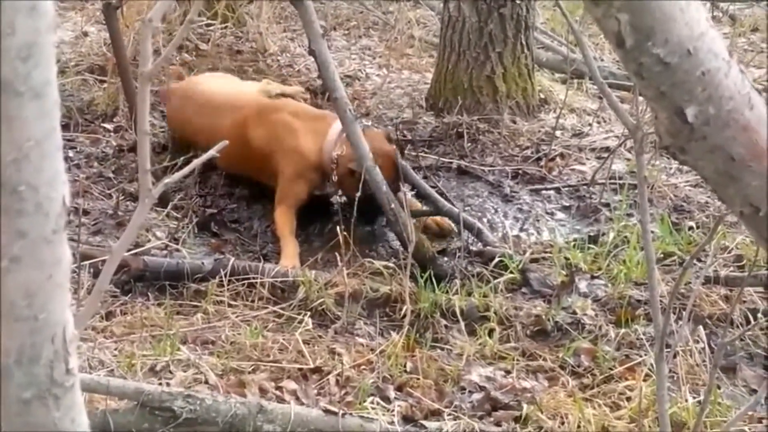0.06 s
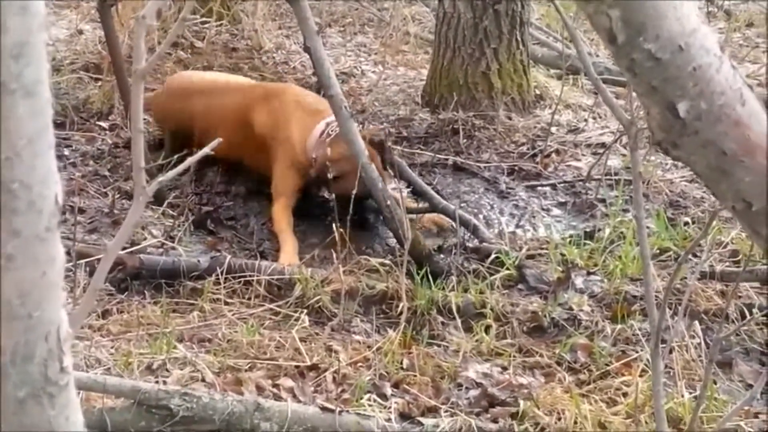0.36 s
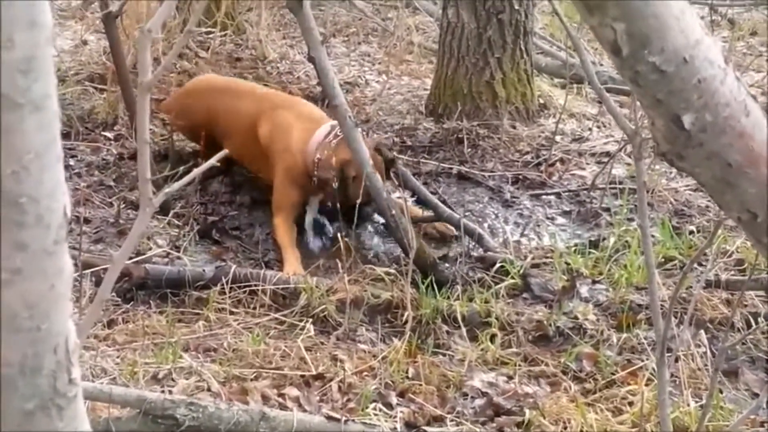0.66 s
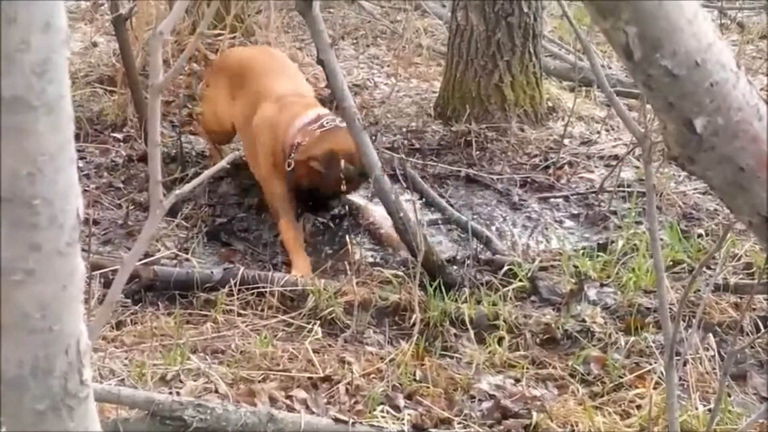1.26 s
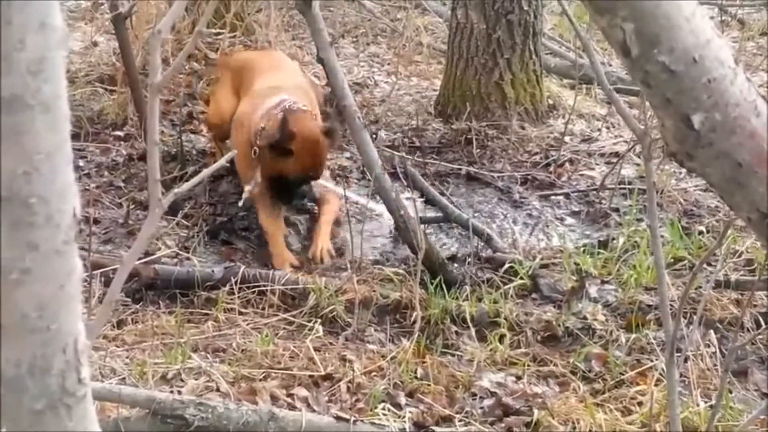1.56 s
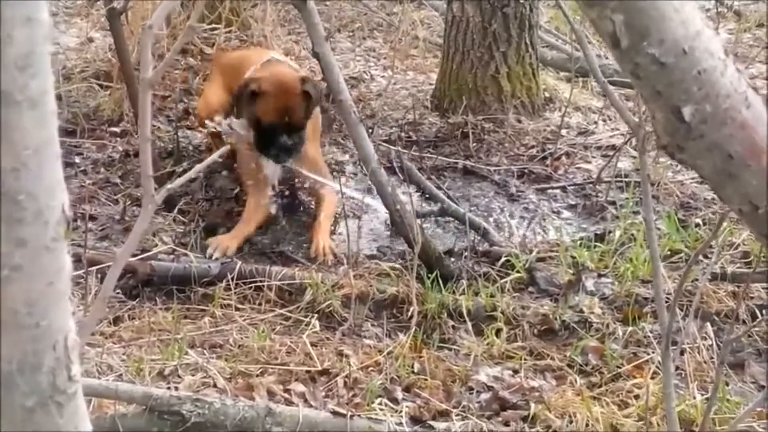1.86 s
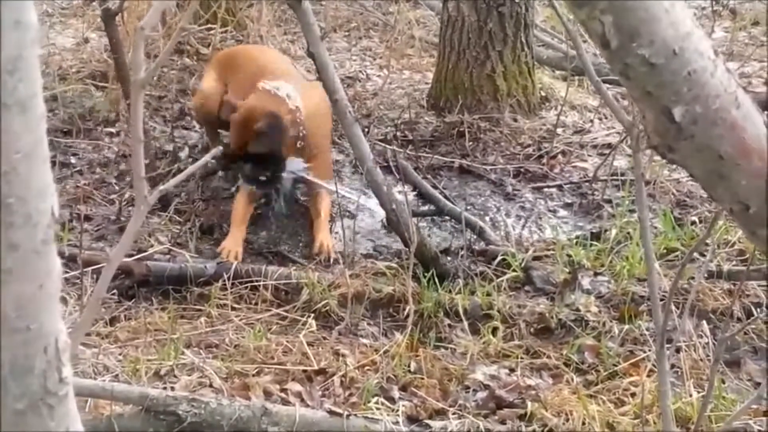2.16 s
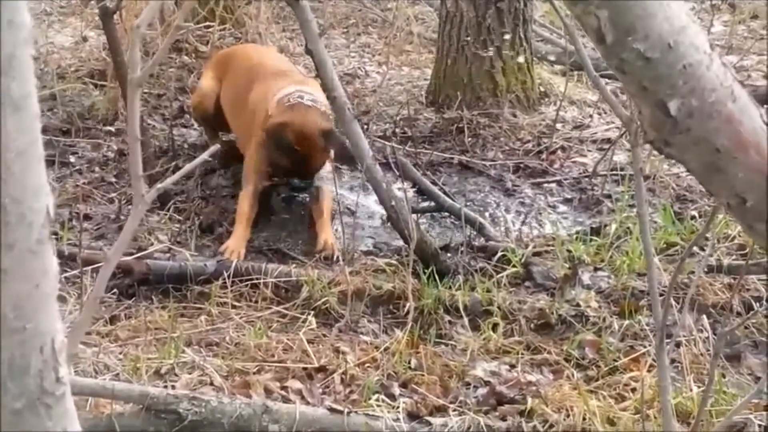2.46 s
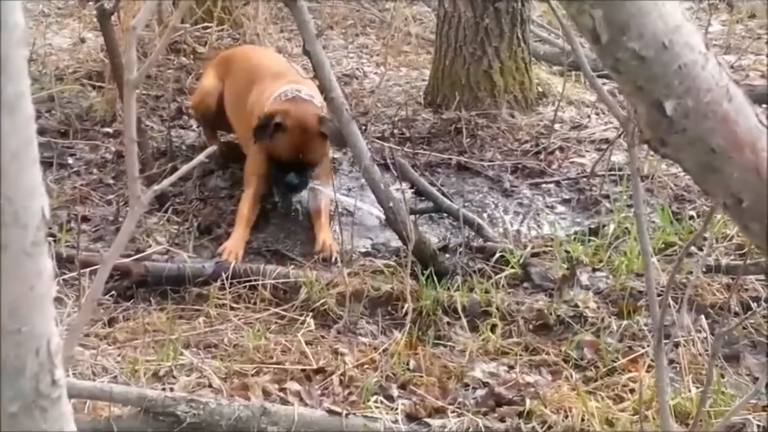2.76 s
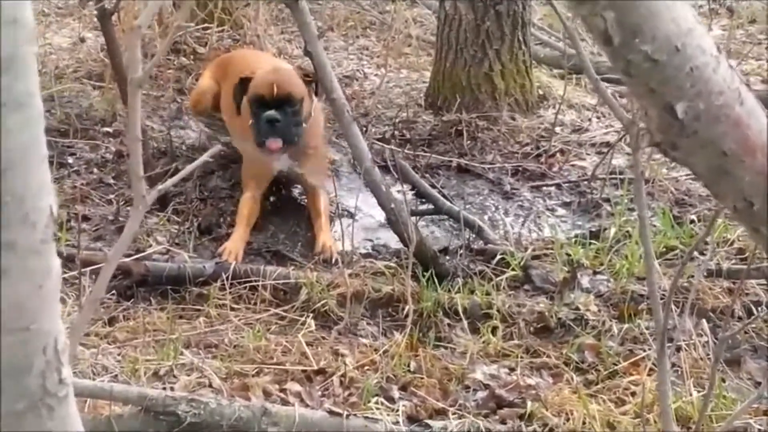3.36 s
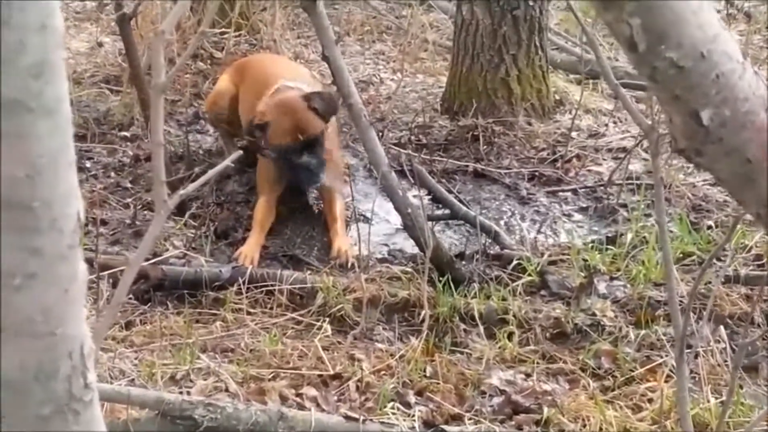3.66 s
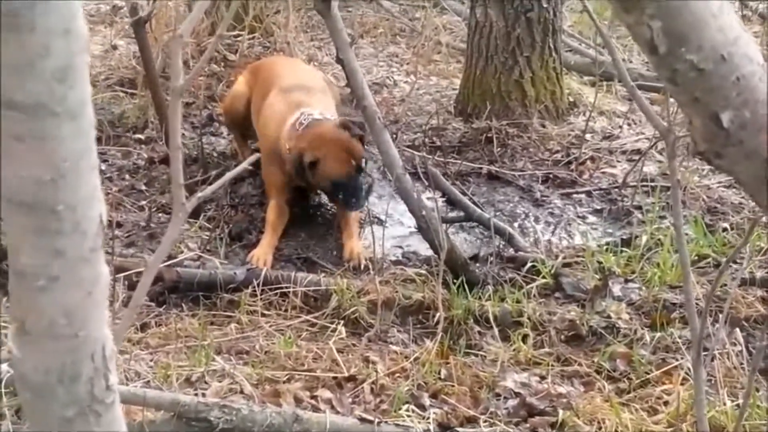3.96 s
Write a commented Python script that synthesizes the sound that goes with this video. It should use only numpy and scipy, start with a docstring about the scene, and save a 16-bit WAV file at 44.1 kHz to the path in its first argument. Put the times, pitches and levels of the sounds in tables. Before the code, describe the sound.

Hissing sprinkler spray splutters in a dog's mouth, with sloshes, plops and wet smacks.

```python
"""A dog bites at a sprinkler jet over wet woodland ground. Light wind and a soft rush run throughout.
The jet, almost blocked at first, hisses from 0.14 s, spatters on the muzzle and patters on leaves.
From 0.35 s it drums in the open mouth and rings over the lips; jaws and paws slosh and plop.
It spits off the teeth from 0.7 s, hardest at 1.65 s; wet smacks join at 1.1 s.
Near 3 s the jet is almost blocked again, then the hiss and the biting go on to 4 s."""
import sys
import numpy as np
from scipy import signal
from scipy.fft import rfft, irfft, next_fast_len
from scipy.io import wavfile
from scipy.ndimage import uniform_filter1d, map_coordinates

SR = 44100
rng = np.random.default_rng(int(sys.argv[2]) if len(sys.argv) > 2 else 0)


def generate_wav(signal):
    """Clip the signal to [-1, 1] and save it as 16-bit WAV at the path in sys.argv[1]."""
    frames = np.transpose(np.atleast_2d(signal))
    scaled = np.clip(frames, -1, 1) * 32767
    pcm = np.round(scaled).astype(np.int16)
    wavfile.write(sys.argv[1], SR, pcm)


N = 4 * SR

# Source spectra. Each row: frequency in Hz, relative density in dB.
AIR_SPECTRUM = [(50, 1), (95, 3), (140, -2), (250, 0), (500, 1), (900, -3), (1400, -9), (2200, -19.5),
                (4000, -27), (8000, -33), (15000, -42)]
WIND_SPECTRUM = [(10, -10), (25, 0), (40, -4.5), (60, -7), (85, -11.5), (130, -20), (300, -57), (900, -100)]
HISS_SPECTRUM = [(1000, -52), (2500, -40), (4500, -23.5), (7000, -8.5), (8200, -3.5), (9500, -0.5),
                 (12000, 0.5), (14000, -.5), (15800, -5.5)]
SPATTER_SPECTRUM = [(800, -28), (1700, -5), (2600, -7), (3400, -3.5), (4400, 1.5), (5300, -0.5), (6300, 2),
                    (8000, -4.5), (10000, -10), (15000, -6.5)]
PATTER_SPECTRUM = [(500, -12), (1200, -4.5), (2000, -0.5), (2600, 0), (3500, -0.5), (5500, -5.5),
                   (12000, -9)]
LOW_CAVITY_SPECTRUM = [(60, -45), (160, -9), (300, -11), (490, 4), (720, 0.5), (950, 1.5), (1250, -6.5),
                       (2200, -33.5)]
HIGH_CAVITY_SPECTRUM = [(600, -36), (1100, -5.5), (1550, 5), (1800, 0.5), (2200, -10.5), (3200, -13.5),
                        (6000, -43)]
SPIT_SPECTRUM = [(300, -13), (2500, -15), (5500, -9.5), (8000, -5), (12500, -1), (15800, 0)]
SMACK_SPECTRUM = [(300, -8), (1500, -8), (2600, -3), (4300, 2), (6500, -8), (10000, -9), (15800, -2)]
# Wind, jet hiss and spatter envelopes. Each row: time in seconds, relative level in dB.
WIND_LEVELS = [(0.0, -49.5), (0.19, -70), (0.96, -56), (1.01, -66.5), (1.98, -65), (2.57, -72), (2.78, -63),
               (2.84, -71.5), (3.71, -59.5), (3.74, -72), (3.97, -60.5), (4.0, -81)]
HISS_LEVELS = [(0, -94), (.11, -95), (.14, -52.5), (.19, -49.5), (.33, -50), (.44, -42.5), (.48, -51),
               (.61, -45), (.66, -48.5), (.715, -58), (.725, -49), (.75, -49), (.95, -47), (1.0, -55),
               (1.03, -55), (1.05, -47.5), (1.09, -41), (1.12, -47.5), (1.38, -51), (1.43, -48),
               (1.58, -55), (1.65, -46.5), (1.68, -50), (1.89, -54.5), (2.13, -55.5), (2.21, -43),
               (2.23, -50.5), (2.37, -43.5), (2.43, -48.5), (2.52, -50), (2.65, -45.5), (2.7, -50.5),
               (2.86, -46), (2.97, -49), (3.01, -65.5), (3.06, -60.5), (3.095, -72), (3.115, -52),
               (3.25, -51), (3.31, -45), (3.35, -50.5), (3.55, -46.5), (4, -49.5)]
SPATTER_LEVELS = [(0.0, -98), (0.1, -93), (0.13, -65), (0.29, -64), (0.46, -50), (0.48, -57), (0.66, -53),
                  (0.7, -66.5), (0.78, -51.5), (0.97, -54.5), (1.01, -63), (1.08, -53), (1.35, -57.5),
                  (1.47, -55), (1.56, -56), (1.65, -53), (1.66, -55), (1.67, -51.5), (1.71, -57),
                  (2.17, -59.5), (2.19, -52.5), (2.29, -52.5), (2.33, -52.5), (2.38, -58.5), (2.66, -51),
                  (2.71, -68.5), (2.74, -57), (2.8, -62), (2.81, -55), (2.97, -57), (3.02, -78), (3.2, -67),
                  (3.21, -55), (3.23, -64), (3.33, -60.5), (3.35, -71), (3.59, -61), (3.9, -68.5),
                  (3.94, -59), (4.0, -77)]
# Lower edge of the jet noise. Each row: time in seconds, cutoff in Hz.
JET_CUTOFFS = [(0, 8900), (.1, 9000), (.135, 3500), (.17, 4500), (.3, 3150), (.44, 2220), (.65, 2020),
               (.73, 3420), (.95, 2940), (1.11, 3500), (1.15, 2420), (1.19, 3520), (1.27, 3300),
               (1.33, 1500), (1.9, 1970), (2.06, 3500), (2.15, 2400), (2.46, 3350), (2.58, 3080),
               (2.65, 2230), (2.74, 4070), (2.84, 3630), (2.962, 2180), (3.01, 8200), (3.1, 9100),
               (3.16, 6800), (3.22, 3500), (4, 3430)]
# Mouth cavity drumming. Each row: time in seconds, low resonance in dB, high resonance in dB.
MOUTH_LEVELS = [(0, -69, -91), (.33, -74, -70), (.41, -59.5, -61), (.66, -70, -60), (.73, -68.5, -75),
                (1.02, -72, -64.5), (1.07, -50.5, -66), (1.13, -73.5, -70), (1.28, -70, -68),
                (1.39, -57, -52), (1.46, -54, -60.5), (1.54, -62, -52), (1.6, -72, -62.5), (1.78, -68, -63),
                (2.0, -97, -72.5), (2.21, -72.5, -73.5), (2.3, -55, -89), (2.38, -61, -61.5),
                (2.54, -70, -96), (2.63, -53.5, -56.5), (2.69, -66, -76), (2.82, -70.5, -93),
                (2.92, -57, -65), (3.02, -71, -87), (4, -71.5, -73.5)]
# Lip resonance, lower as the cavity deepens. Each row: time in seconds, centre in Hz, level in dB.
LIP_RESONANCE = [(0, 4440, -106), (.36, 4300, -69), (.43, 3830, -64), (.5, 4300, -71), (.74, 4540, -63.5),
                 (.81, 4730, -60), (1.0, 4550, -72), (1.15, 3950, -83), (1.22, 4150, -52),
                 (1.28, 3470, -75), (1.304, 3060, -53), (1.36, 3130, -64.5), (1.47, 2970, -62),
                 (1.6, 3000, -67.5), (1.82, 3440, -61), (2.15, 3520, -91), (2.34, 3760, -61),
                 (2.46, 4380, -74), (2.57, 3740, -59), (2.65, 3340, -82), (2.72, 4070, -84), (4, 4230, -99)]
# Bubble clusters. Each row: start in seconds, level in dB, length in seconds, centre pitch in Hz.
SLOSH_EVENTS = [(0.361, -49.5, 0.023, 485), (0.388, -56, .014, 600), (1.043, -57.5, 0.049, 950),
                (0.366, -48.5, .017, 1480), (1.353, -61, 0.011, 1660), (1.4, -75, 0.014, 1430),
                (1.635, -46.5, 0.011, 537), (1.649, -50, 0.019, 1240), (1.975, -59.5, .014, 650),
                (2.054, -53, .012, 1470), (2.071, -54.5, 0.02, 1460), (2.203, -56.5, 0.013, 940),
                (2.644, -48.5, 0.016, 876), (2.858, -57.5, .04, 750), (2.902, -51, 0.033, 528),
                (3.221, -55, 0.014, 2050), (3.222, -54, .012, 460), (3.549, -54.5, 0.034, 1670),
                (3.78, -61.5, 0.018, 1890), (3.826, -59, 0.01, 975), (3.931, -51.5, 0.017, 680),
                (3.979, -56.5, .012, 510)]
# Air pockets. Each row: start in seconds, relative level in dB, pitch in Hz, T60 in seconds.
PLOP_EVENTS = [(.494, -41, 520, 0.016), (.495, -42.5, 1510, 0.026), (.553, -39.5, 1570, 0.013),
               (0.944, -43.5, 996, 0.027), (1.361, -40.5, 1700, 0.031), (1.378, -42, 600, 0.021),
               (1.395, -38, 1630, 0.031), (1.513, -37, 492, 0.038), (1.517, -33, 986, 0.027),
               (1.636, -37.5, 292, 0.052), (1.657, -31, 850, 0.019), (1.663, -39, 530, 0.033),
               (1.972, -39.5, 466, 0.029), (2.057, -37, 1240, 0.019), (2.423, -35, 257, 0.04),
               (2.605, -46, 1400, 0.035), (2.622, -37.5, 953, 0.054), (2.643, -35, 933, 0.045),
               (2.656, -42, 447, 0.049), (2.907, -40, 313, 0.071), (3.091, -49, 477, 0.064),
               (3.207, -38.5, 283, 0.026), (3.3, -38.5, 245, 0.044), (3.329, -38, 1410, 0.033),
               (3.564, -26.5, 1660, 0.013), (3.641, -38, 1680, 0.027), (3.946, -39, 294, 0.058)]
# Droplet bursts. Each row: start in seconds, level in dB, T60 in seconds.
SPIT_EVENTS = [(.7222, -33, .02), (.731, -39, .03), (1.144, -42, .02), (1.6533, -26, .02),
               (1.6554, -16, .005), (1.658, -24, .03), (2.7843, -32, .008), (2.808, -38, .015),
               (2.85, -37, .008)]
SMACK_EVENTS = [(1.144, -40.5, 0.038), (1.762, -40, 0.04), (1.998, -46, 0.035), (2.122, -42.5, 0.026),
                (2.1875, -43, 0.012), (2.644, -44, .03), (2.802, -66, 0.019), (3.2075, -35, 0.014),
                (3.33, -52, 0.051), (3.564, -39, 0.029), (3.612, -50.5, 0.22), (3.641, -49, .04),
                (3.787, -48, 0.1), (3.925, -50.5, 0.14)]
# Scatter from trunks and ground. Each row: frequency in Hz, T60 in seconds.
WOODS_DECAY = [(200, 0.075), (2000, 0.17), (12000, 0.29)]
# Lead of the right channel. Each row: frequency in Hz, phase in radians.
RIGHT_PHASE_LEAD = [(50, 0), (300, .1), (900, .3), (4000, .45), (11000, .52), (15800, .3)]


def amp(db):
    return 10 ** (np.asarray(db) / 20)


def unit_rms(x):
    return x / np.sqrt(np.mean(x ** 2) + 1e-20)


def decay(t, t60_s):
    return np.exp(-np.log(1000) * t / t60_s)


def log_interp(rows, hz):
    """Table value at hz, on a log frequency axis."""
    knots_hz, values = np.transpose(rows)
    return np.interp(np.log(hz + 1), np.log(knots_hz + 1), values)


def curves(rows):
    """One per-sample curve for each column after the time."""
    times_s, *columns = np.transpose(rows)
    return [np.interp(np.arange(N) / SR, times_s, column) for column in columns]


def wobble(rate_hz):
    """Smooth random curve with knots at rate_hz."""
    knots = rng.standard_normal(int(N * rate_hz / SR) + 4)
    return map_coordinates(knots, [np.arange(N) * rate_hz / SR])


def filtered(x, response):
    size = next_fast_len(N + SR // 2)
    return irfft(rfft(x, size) * response(np.fft.rfftfreq(size, 1 / SR)), size)[..., :N]


def coloured(x, spectrum):
    """Spectral shaping that keeps the power of white noise."""
    return filtered(x, lambda hz: unit_rms(amp(log_interp(spectrum, hz))))


def mix_in(track, start_s, sound):
    i = int(np.clip(round(start_s * SR), 0, N - 1))
    track[i:i + len(sound)] += sound[:N - i]


def panned(x, right_db):
    """Point source: right channel right_db over the left and slightly earlier."""
    side = np.array([[-.5], [.5]])
    return filtered(x, lambda hz: amp(side * right_db) * np.exp(1j * side * log_interp(RIGHT_PHASE_LEAD, hz)))


def spread(source, spectrum, right_db, diffuse_db):
    """Panned source plus diffuse noise, coloured and normalised."""
    pair = coloured(panned(source, right_db) + amp(diffuse_db) * rng.standard_normal((2, N)), spectrum)
    return pair / pair.mean(0).std()


def outdoors():
    """Soft, uneven rush of air; light wind rumbles on the microphone."""
    air = spread(rng.standard_normal(N), AIR_SPECTRUM, right_db=3, diffuse_db=-7)
    wind = spread(rng.standard_normal(N), WIND_SPECTRUM, right_db=-2, diffuse_db=2)
    air_db = -62.5 + 1.5 * wobble(17)
    wind_db = curves(WIND_LEVELS)[0] + 2.0 + 1.5 * wobble(7.86)
    return air * amp(air_db) + wind * amp(wind_db)


def droplets(rate_hz, spread_db, mist):
    """Random impacts of random size over a share of smooth mist."""
    hits = (rng.random(N) < rate_hz / SR) * rng.standard_normal(N)
    sizes = amp(spread_db * np.clip(rng.standard_normal(N), -2, 2))
    return unit_rms(unit_rms(hits * sizes) + mist * rng.standard_normal(N))


def patchy(x, depth_db):
    """The colour shifts at random as the stream breaks up."""
    bins = signal.stft(x, nperseg=1024)[2]
    field = uniform_filter1d(rng.standard_normal(bins.shape[1:]), size=9, axis=0)
    field = unit_rms(uniform_filter1d(field, size=5, axis=1))
    return unit_rms(signal.istft(bins * amp(depth_db * field), nperseg=1024)[1][:, :N]) * x.std()


def jet_highpass(x):
    """Moving cutoff: low on a square hit, high when the jet grazes or is pinched off."""
    times_s, cutoff_hz = np.transpose(JET_CUTOFFS)
    hz, t, bins = signal.stft(x, SR, nperseg=256)
    gain = 1 / np.sqrt(1 + (np.interp(t, times_s, cutoff_hz) / (hz[:, None] + 1)) ** 10)
    return signal.istft(bins * gain, SR, nperseg=256)[1][:, :N]


def jet():
    """Fine hiss and coarser spatter flutter together; the spatter also clumps."""
    flutter_db = 1.14 * wobble(45) + 1.12 * wobble(240)
    clumps_db = 1.07 * wobble(40.08) + wobble(150)
    fine = droplets(rate_hz=5000, spread_db=4.5, mist=1.0)
    hiss = spread(fine, HISS_SPECTRUM, right_db=5.2, diffuse_db=-4.5)
    coarse = droplets(rate_hz=2000, spread_db=4, mist=1.0)
    spatter = spread(coarse, SPATTER_SPECTRUM, right_db=7.5, diffuse_db=-2)
    hiss = patchy(hiss, depth_db=2.43) * amp(curves(HISS_LEVELS)[0] + flutter_db + 0.62)
    spatter_db = curves(SPATTER_LEVELS)[0] + flutter_db + clumps_db + 2.32
    return jet_highpass(hiss + patchy(spatter, depth_db=3.44) * amp(spatter_db))


def leaf_patter():
    """Stray drops hit wet leaves; the level follows the hiss."""
    drops = np.array([droplets(rate_hz=900, spread_db=2.5, mist=0.7) for _ in range(2)])
    level_db = curves(HISS_LEVELS)[0] - 21 + 2.3 * wobble(22)
    return panned(coloured(drops, PATTER_SPECTRUM), right_db=5) * amp(level_db)


def mouth_drumming():
    """Drops excite two cavity resonances of the open mouth."""
    low_db, high_db = curves(MOUTH_LEVELS)
    low_drops = droplets(rate_hz=400, spread_db=6.0, mist=0.69)
    low = spread(low_drops, LOW_CAVITY_SPECTRUM, right_db=7, diffuse_db=-14)
    high_drops = droplets(rate_hz=350, spread_db=4, mist=0.9)
    high = spread(high_drops, HIGH_CAVITY_SPECTRUM, right_db=11, diffuse_db=-4)
    return patchy(low, depth_db=4.0) * amp(low_db) + patchy(high, depth_db=3.5) * amp(high_db)


def lip_ring(half_width_hz=400):
    """Drops ring one narrow resonance that glides with the mouth's shape."""
    times_s, centre_hz, _ = np.transpose(LIP_RESONANCE)
    hz, t, bins = signal.stft(droplets(rate_hz=1800, spread_db=1.0, mist=0.5), SR, nperseg=256)
    band = 1 / (1 + ((hz[:, None] - np.interp(t, times_s, centre_hz)) / half_width_hz) ** 2)
    ring = unit_rms(signal.istft(bins * band, SR, nperseg=256)[1][:N])
    return panned(ring * amp(curves(LIP_RESONANCE)[1]), right_db=9)


def bubble(hz, t60_s, attack_s, rise=0.042):
    """Damped ring; the pitch rises slightly as it dies."""
    t = np.arange(SR // 12) / SR
    phase = 2 * np.pi * np.cumsum(hz * (1 + rise * np.minimum(t / t60_s, 1))) / SR
    return np.sin(phase) * decay(t, t60_s) * (1 - np.exp(-t / attack_s))


def sloshes(count=14, pitch_scatter=0.18, t60_cycles=11, lowpass_hz=2150):
    """Jaws and paws stir clusters of short-lived bubbles, muffled by the mouth."""
    track = np.zeros(N)
    for start_s, db, length_s, centre_hz in SLOSH_EVENTS:
        cluster = np.zeros(N)
        onsets_s = start_s + length_s * (np.arange(count) + rng.random(count)) / count
        pitches_hz = centre_hz * np.exp(pitch_scatter * rng.standard_normal(count))
        for onset_s, hz in zip(onsets_s, pitches_hz):
            mix_in(cluster, onset_s, bubble(hz, t60_cycles / hz, attack_s=0.0003))
        track += amp(db) * cluster * np.sqrt(length_s * SR / (np.sum(cluster ** 2) + 1e-20))
    return panned(filtered(track, lambda hz: 1 / (1 + (hz / lowpass_hz) ** 10)), right_db=8.5)


def plops():
    """Single air pockets close and ring in the mouth and the puddle."""
    track = np.zeros(N)
    for start_s, db, hz, t60_s in PLOP_EVENTS:
        mix_in(track, start_s, amp(db + 0.5) * bubble(hz, t60_s, attack_s=0.00091))
    return panned(track, right_db=6.5)


def bursts(events, spectrum, attack_s):
    """Sudden droplet showers as fast-decaying noise."""
    envelope, t = np.zeros(N), np.arange(SR // 8) / SR
    for start_s, db, t60_s in events:
        mix_in(envelope, start_s, amp(db) * decay(t, t60_s) * (1 - np.exp(-t / attack_s)))
    return coloured(envelope * rng.standard_normal(N), spectrum)


def spits():
    """The jet glances sharply off the teeth."""
    return panned(bursts(SPIT_EVENTS, SPIT_SPECTRUM, attack_s=0.0004), right_db=5.5)


def smacks():
    """Wet lips and jaws smack."""
    return panned(bursts(SMACK_EVENTS, SMACK_SPECTRUM, attack_s=0.00057), right_db=7)


def woods_scatter(x):
    """Trunks and ground return a short diffuse tail."""
    hz, t, bins = signal.stft(rng.standard_normal((2, SR // 3)), SR, nperseg=256)
    tail = signal.istft(bins * decay(t, log_interp(WOODS_DECAY, hz)[:, None]), SR, nperseg=256)[1]
    return signal.fftconvolve(x.mean(0)[None], tail / np.linalg.norm(tail[0]), axes=1)[:, :N]


def scene():
    """Stereo mix; only the dog feeds the woods' scatter."""
    dog = sloshes() + plops() + smacks()
    water = spits() + jet() + leaf_patter() + mouth_drumming() + lip_ring()
    return water + dog + amp(-11) * woods_scatter(dog) + outdoors()


def record(dry):
    """Brick-wall low-pass."""
    cutoff_hz = 15870
    return filtered(dry, lambda hz: hz < cutoff_hz)


dry = scene()
out = record(dry)
generate_wav(out)
```